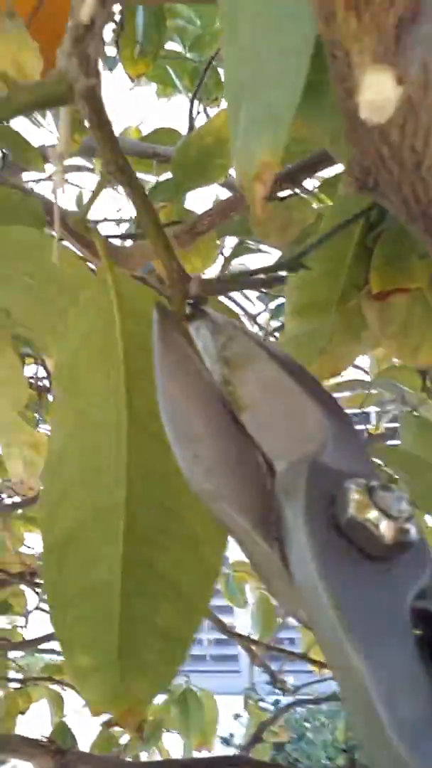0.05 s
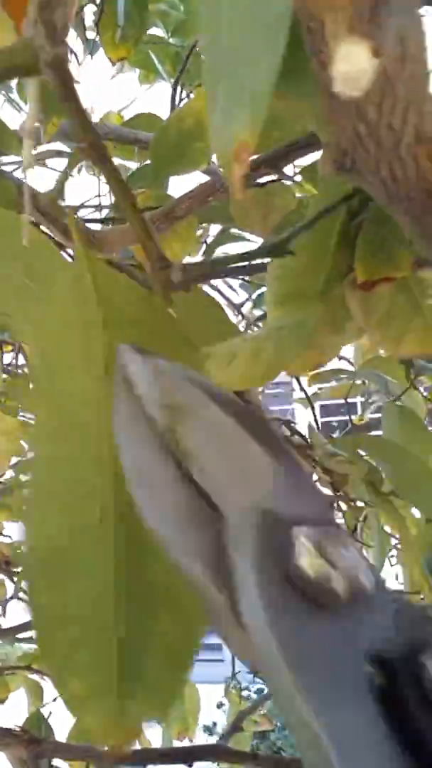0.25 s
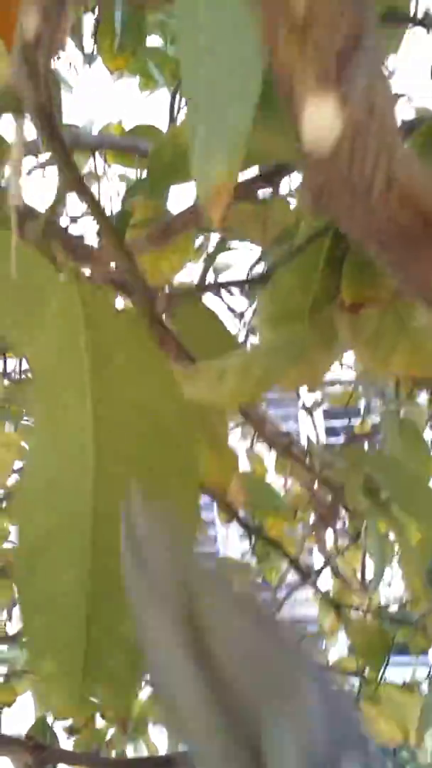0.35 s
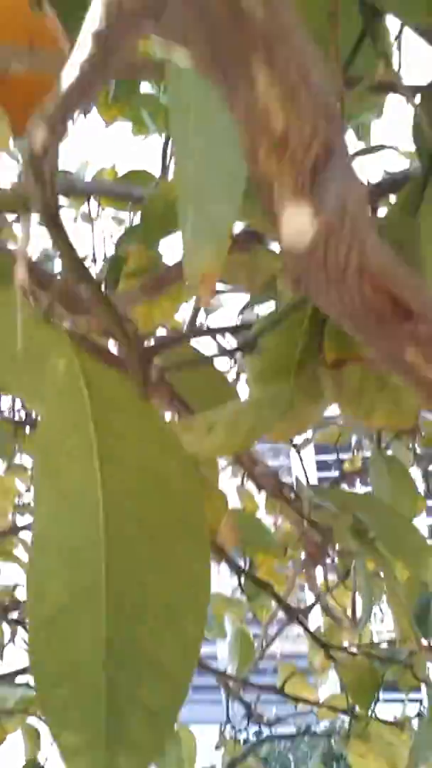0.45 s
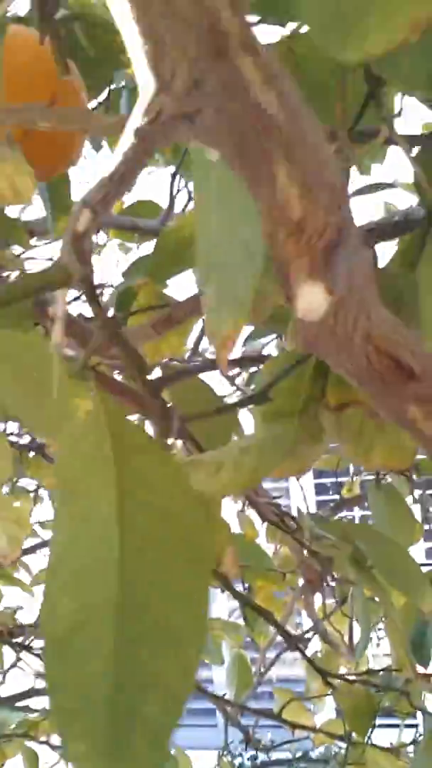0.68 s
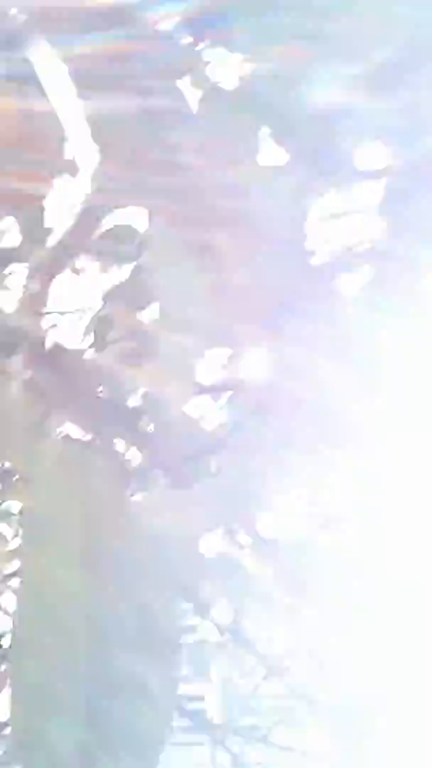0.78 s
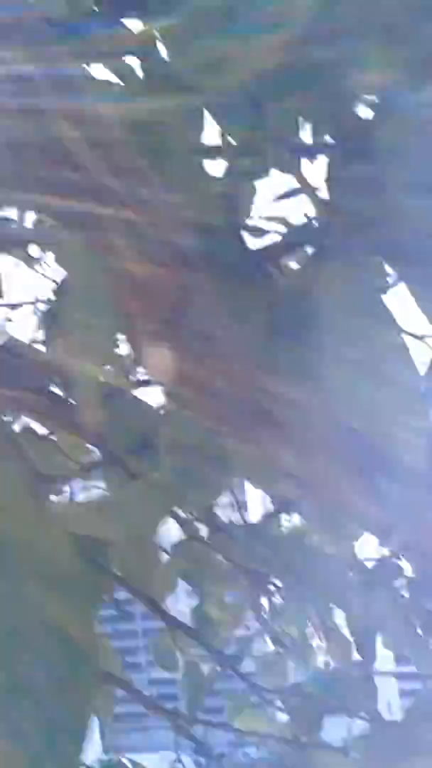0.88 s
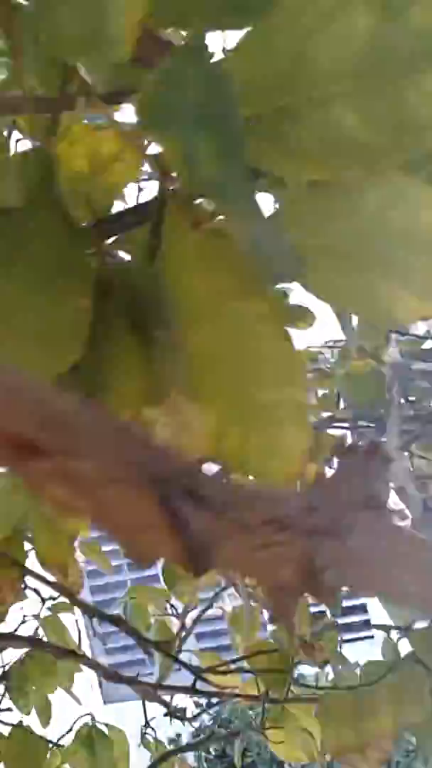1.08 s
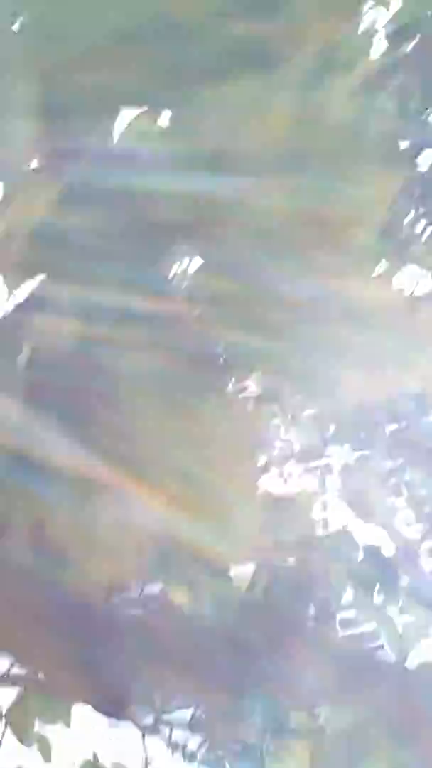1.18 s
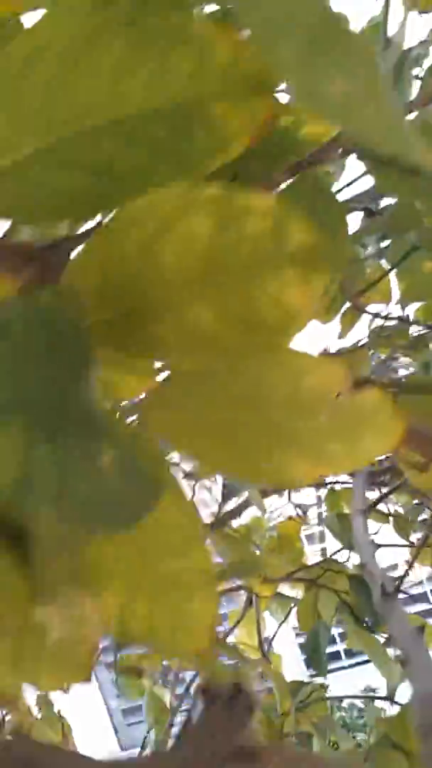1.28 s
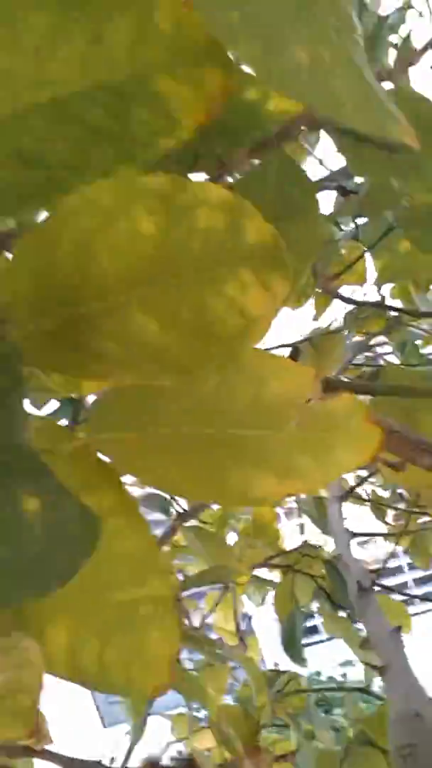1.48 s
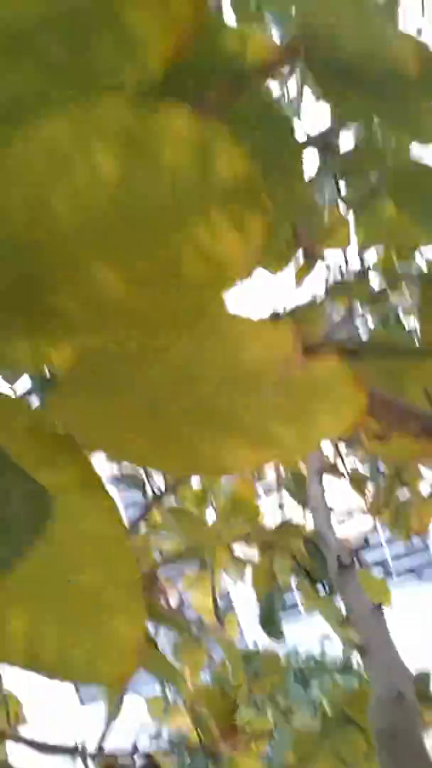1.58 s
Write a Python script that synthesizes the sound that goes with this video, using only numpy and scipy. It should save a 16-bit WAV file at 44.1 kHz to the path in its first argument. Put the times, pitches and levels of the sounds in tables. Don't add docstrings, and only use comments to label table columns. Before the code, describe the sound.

Close phone pickup in a tree outdoors: light leaf brushing, one hard dry metallic snip, a short scrape of opening blades, a crisp slap of leaves and twigs, smaller rustles, low handling rumble and faint hiss.

```python
import sys
import numpy as np
from scipy import signal
from scipy.fft import rfft, irfft
from scipy.io import wavfile
from scipy.ndimage import uniform_filter1d, map_coordinates

SR = 44100
rng = np.random.default_rng(int(sys.argv[2]) if len(sys.argv) > 2 else 0)


def attenuation_scalar(level_db):
    decades = np.asarray(level_db, float) / 20
    return 10 ** decades


def digitize_waveform(pressure):
    field = np.atleast_2d(pressure).T
    bounded = np.clip(field, -1, 1)
    quanta = np.round(bounded * 32767).astype(np.int16)
    wavfile.write(sys.argv[1], SR, quanta)


N = 72765

# [t/s, level/dB]
HANDLING = [(0, -55.5), (.1, -50), (.18, -47), (.25, -43.5), (.34, -52), (.48, -47), (.53, -55.5),
            (.7, -52.5), (.76, -46.5), (.83, -51.5), (.94, -50), (.975, -48.5), (1.09, -51.5), (1.15, -59),
            (1.28, -64.5), (1.31, -55.5), (1.37, -61), (1.6, -50)]
# [f/Hz, level/dB]
RUMBLE_SPECTRUM = [(22, -37.5), (44, -14.5), (65, -4.5), (130, -3), (300, -6.5), (600, -14.5), (1200, -23),
                   (2600, -37)]
RUMBLE_APART, RUMBLE_FLUTTER_DB = 0.44, 1.5

# [f/Hz, level/dB]
HISS_SPECTRUM = [(590, -28), (1000, 0.5), (3440, -16), (3720, -9), (12200, -18.5), (14000, -21),
                 (15000, -34)]
HISS_DB = -71

# [t/s, rms level/dB, attack/s, t60/s, focus of the colour 0-2]
BRUSHES = [(0.064, -48.5, .003, .12, 0.78), (0.12, -55, .006, 0.23, 0.98),
           (0.164, -42.5, 0.0034, 0.31, 0.92), (0.192, -49, 0.0016, 0.17, .9),
           (0.219, -34, 0.0066, 0.39, 0.66), (.405, -45, 0.013, 0.29, 0.5),
           (0.444, -37.5, 0.015, 0.097, 0.93), (0.616, -58, 0.0038, 0.35, 0.98),
           (0.7, -57.5, 0.0098, 0.17, 0.89), (0.7246, -18, 0.0054, 0.086, 1.47),
           (0.751, -40, 0.0051, 0.35, 1.09), (0.7246, -31.5, 0.002, 0.16, 0.39),
           (.83, -59.5, 0.041, 0.4, 0.83), (0.923, -47.5, 0.0026, 0.035, 0.96),
           (0.963, -36, .009, 0.14, 0.96), (1.039, -49.5, .005, .12, 0.77),
           (1.063, -46.5, 0.003, 0.15, 0.8), (1.12, -63.5, .01, .15, 0.73),
           (1.239, -68.5, .004, 0.082, 0.81), (1.451, -61, .002, 0.21, 0.43),
           (1.471, -48.5, 0.0011, 0.18, 0.62), (1.478, -53, 0.046, .9, 0.75),
           (1.551, -48.5, 0.0025, 0.45, 0.76), (1.601, -53.5, 0.0022, 0.92, 0.81)]
# [t/s, rms level/dB, focus of the colour 0-2]
SNAPS = [(.08, -43.5, 1.1), (0.1496, -37, 0.85), (.244, -30.5, 0.68), (.26, -33.5, 0.25),
         (.289, -37.5, 1.2), (.776, -35.5, 1.48), (0.406, -48, 1.24), (.631, -42.5, 0.99),
         (1.5528, -50, 1.1), (1.604, -55, 0.78)]
SNAP_ATTACK_S, SNAP_T60_S = 0.0012, 0.036
# [f/Hz, level/dB]
LEAF_SPECTRUM = [(500, -30.5), (1000, -13), (2000, -12), (3500, -9.5), (5000, -5), (6500, 2.5), (8300, -16),
                 (14000, -23.5)]
# [t/s, left-right level/dB]
HAND_BALANCE = [(0, -3.5), (.18, -2), (.2, 1.5), (.245, 0.5), (.34, -2.5), (.41, 5.5), (.6, 2.5), (.74, 2),
                (.78, 0), (.88, 5.5), (.98, 4), (1.06, 3), (1.26, 3.5), (1.45, 9.5), (1.65, 7)]
LEAF_GRAINS_PER_S, LEAF_SPREAD_DB, LEAF_SCATTER_DB = 1450, 3.0, 3
LEAF_CYCLES, LEAF_APART = 10.7, 0.92
LAG_S_PER_DB = 5e-5
# [t/s, f/Hz, level/dB, t60/s]
THORN_TICK = (1.033, 2300, -42, .011)

# [f/Hz, level/dB, t60/s, left-right level/dB]
SHEAR_MODES = [(324, -9, .018, 11), (895, -14, 0.028, 11), (1570, -18, 0.016, 12), (1728, -9.5, 0.018, 7.5),
               (2340, -1, 0.029, 15), (3344, -2.5, .015, 5), (3550, -5, 0.012, 6), (4010, -9, 0.014, -8),
               (4990, -7.5, .01, 5.5), (5270, 0.5, .011, 12), (5850, -12.5, 0.0075, 12.5),
               (6450, -10, 0.015, -17), (6700, -11, .009, -17), (980, -8.5, 0.042, 8.5)]
# [t/s, level/dB, brightness/(dB per octave), crunch t60/s]
CUTS = [
    (.2030, -25, 6, 0.036),
    (.2080, -11, -0.5, 0.01),
    (.2125, -5, 3, .006),
    (.2143, -11.5, -0.5, 0.016),
    (.2222, -31, 11.5, 0.01),
]
CRUNCH_DB, CRACK_DB, STRIKE_DB = -13.5, -13.5, -7
MODE_SCATTER_DB, SHEARS_LOW_HZ = 3.5, 184
GAP_HZ = 654
# [t/s, level/dB]
SCRAPE = [
    (.4, -89.5),
    (.408, -46.5),
    (.425, -48.5),
    (.45, -45),
    (.47, -44),
    (.485, -54),
    (.5, -66.5),
]
# [f/Hz, level/dB, t60/s]
BLADE_MODES = [(899, 0, .05), (2280, -9, .02), (3300, -13, .012), (5010, -12, .01), (5690, -10, .01),
               (6780, -9, .01)]
SCRAPE_PER_S, SCRAPE_DB = 1200, -5.5

# [t/s, f/Hz, rms level/dB]
TWIGS = [(0.724, 1026, -41), (.726, 1723, -38.5), (.726, 3650, -33), (0.728, 5480, -23.5),
         (.726, 6830, -30), (.726, 8730, -23.5), (0.727, 11000, -27.5), (0.725, 12560, -31.5),
         (0.964, 3230, -43), (0.965, 4154, -34.5), (0.964, 5200, -44), (.966, 6650, -37),
         (0.926, 3140, -60)]
TWIG_ATTACK_S, TWIG_T60_S = 0.006, 0.12
TWIG_CYCLES = 65

TOP_HZ = 14700


def unit(x):
    return x / np.sqrt(np.mean(x ** 2))


def colour(x, spectrum):
    hz, db = np.array(spectrum).T
    log_gain = np.interp(np.log(np.linspace(1, SR / 2, 2049)), np.log(hz), db) * np.log(10) / 20
    cepstrum = irfft(log_gain)
    cepstrum[1:2048] *= 2
    cepstrum[2049:] = 0
    response = irfft(np.exp(rfft(cepstrum)))
    return signal.fftconvolve(np.atleast_2d(x), response[None])[:, :np.shape(x)[-1]]


def curve(table):
    s, db = np.array(table).T
    return attenuation_scalar(np.interp(np.arange(N) / SR, s, db))


def handling():
    noise = rng.standard_normal((3, N))
    flutter = uniform_filter1d(rng.standard_normal(N), size=700)
    flutter = unit(uniform_filter1d(flutter, size=700))
    rumble = unit(colour(noise[0] + RUMBLE_APART * noise[1:], RUMBLE_SPECTRUM))
    return rumble * curve(HANDLING) * attenuation_scalar(RUMBLE_FLUTTER_DB * flutter)


def air():
    noise = rng.standard_normal((3, N))
    spectrum = [(300, -36.5)] + list(HISS_SPECTRUM)
    return attenuation_scalar(HISS_DB) * unit(colour(0.2 * noise[0] + noise[1:], spectrum))


def ring(x, hz, t60):
    pole = np.exp(2j * np.pi * hz / SR - np.log(1000) / (t60 * SR))
    return signal.lfilter([0, pole.imag], [1, -2 * pole.real, abs(pole) ** 2], x)


def twice(x, hz, t60):
    return ring(ring(np.diff(x, prepend=0), hz, t60), hz, t60)


def swell(s, attack, t60):
    since = np.maximum(np.arange(N) / SR - s, 0)
    decay = attenuation_scalar(-60 * (since - attack) / t60)
    return np.where(since < attack, (since / attack) ** 2, decay)


def grains(shape, per_s, spread_db):
    chance, sign, size = rng.random((3,) + shape)
    height = attenuation_scalar(-spread_db * np.log(size + 0.04))
    return unit((chance < per_s / SR) * np.sign(sign - 0.5) * height)


def leaves():
    t = np.arange(N) / SR
    hz = np.geomspace(450, 14500, num=26)
    swarm = np.array([unit(twice(grains((3, N), LEAF_GRAINS_PER_S, LEAF_SPREAD_DB), f, LEAF_CYCLES / f))
                      for f in hz])
    leaf_hz, leaf_db = np.array(LEAF_SPECTRUM).T
    spectrum_db = np.interp(np.log(hz), np.log(leaf_hz), leaf_db)
    snaps = [(s, db, SNAP_ATTACK_S, SNAP_T60_S, focus) for s, db, focus in SNAPS]
    power = np.zeros((len(hz), N))
    for s, db, attack, t60, focus in list(BRUSHES) + snaps:
        scatter_db = LEAF_SCATTER_DB * rng.standard_normal(len(hz))
        bands = attenuation_scalar(focus * spectrum_db + scatter_db) * np.sqrt(hz)
        share = bands ** 2 / np.sum(bands ** 2)
        power += np.outer(share, (attenuation_scalar(db) * swell(s, attack, t60)) ** 2)
    same, left, right = np.einsum("bn,bcn->cn", np.sqrt(power), swarm)
    balance = np.interp(t, *np.array(HAND_BALANCE).T)
    late = map_coordinates(same, [(t - balance * LAG_S_PER_DB) * SR], mode="nearest")
    ports = np.array([same + LEAF_APART * left, late + LEAF_APART * right])
    rustle = ports * attenuation_scalar(np.array([balance, -balance]) / 2)
    s, tick_hz, db, t60 = THORN_TICK
    return rustle + attenuation_scalar(db) * swell(s, t60 / 5, t60) * np.sin(2 * np.pi * tick_hz * t)


def pan(db):
    return attenuation_scalar(np.array([[db], [-db]]) / 2)


def body(push, tilt_db):
    scatter = MODE_SCATTER_DB * rng.standard_normal(len(SHEAR_MODES))
    out = 0
    for (hz, db, t60, balance), extra_db in zip(SHEAR_MODES, scatter):
        tilt = tilt_db * np.log2(max(hz, 1000) / 2500)
        out = out + attenuation_scalar(db + extra_db + tilt) * pan(balance) * ring(push, hz, t60)
    out = signal.lfilter(*signal.iirnotch(GAP_HZ, 1.5, fs=SR), out)
    return signal.sosfilt(signal.butter(2, SHEARS_LOW_HZ, "high", fs=SR, output="sos"), out)


def cutting():
    out, t = 0, np.arange(N) / SR
    for s, db, tilt_db, t60 in CUTS:
        since = np.maximum(t - s, 0)
        envelope = np.minimum(since / 0.00044, 1) * attenuation_scalar(db - 60 * since / t60)
        crunch = envelope * rng.standard_normal((3, N))
        pulse = np.maximum(1 - abs(t - s - 0.0003) * SR / 2, 0)
        push = attenuation_scalar(db + STRIKE_DB) * pulse + attenuation_scalar(CRUNCH_DB) * crunch[0]
        crack = np.diff(crunch, axis=0)
        out = out + body(push, tilt_db) / 3 + attenuation_scalar(CRACK_DB) * crack
    return out


def scraping():
    t = np.arange(N) / SR
    sliding = (t > SCRAPE[0][0]) * (t < SCRAPE[-1][0])
    rub = grains((N,), SCRAPE_PER_S, 1.8) * curve(SCRAPE) * sliding
    rub = np.diff(rub, prepend=0)
    blades = sum(attenuation_scalar(db) * ring(rub, hz, t60) * 1000 / hz for hz, db, t60 in BLADE_MODES)
    return pan(9) * attenuation_scalar(SCRAPE_DB) * blades


def twigs():
    out = 0
    for s, hz, db in TWIGS:
        drive = np.diff(rng.standard_normal((3, N)), axis=0)
        rattle = unit(ring(drive, hz, TWIG_CYCLES / hz))
        out = out + attenuation_scalar(db) * swell(s, TWIG_ATTACK_S, TWIG_T60_S) * rattle
    return out


def scene():
    return cutting() + scraping() + leaves() + twigs() + handling() + air()


def band_limit(x):
    return signal.sosfilt(signal.butter(12, 15590, fs=SR, output="sos"), x)


def record(dry):
    lowpass = signal.ellip(8, 0.2, 55, TOP_HZ, fs=SR, output="sos")
    mix = signal.sosfilt(lowpass, dry)
    return band_limit(mix)


dry = scene()
out = record(dry)
digitize_waveform(out)
```